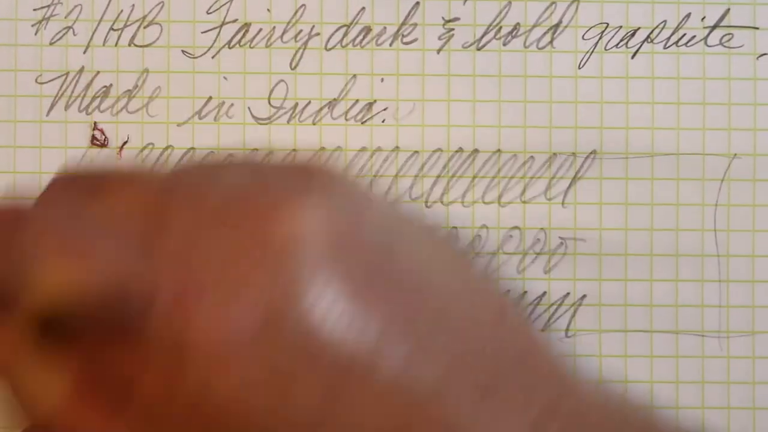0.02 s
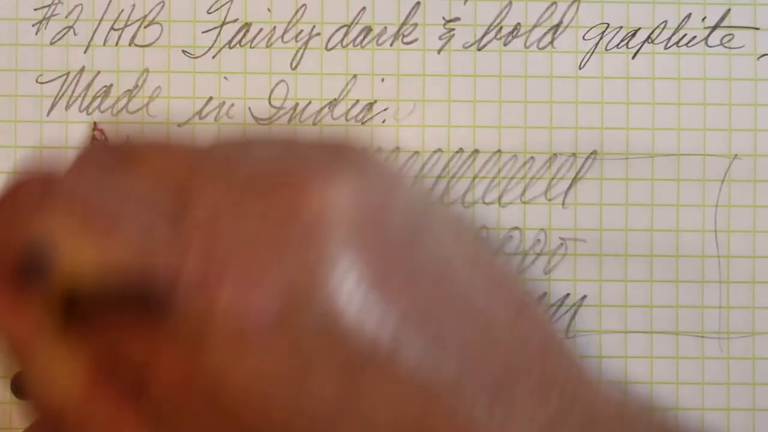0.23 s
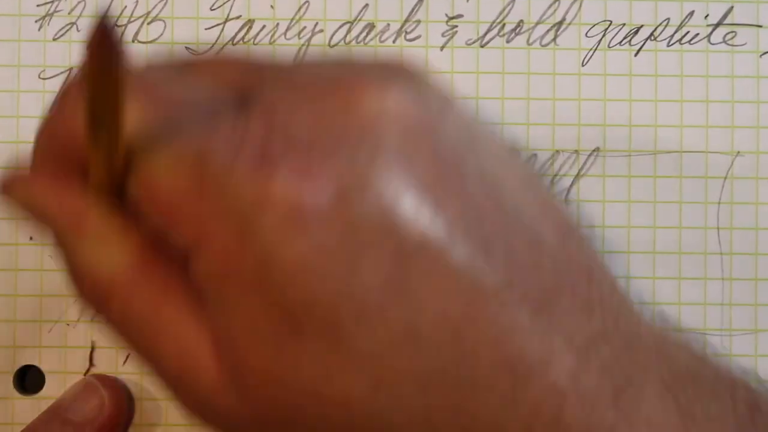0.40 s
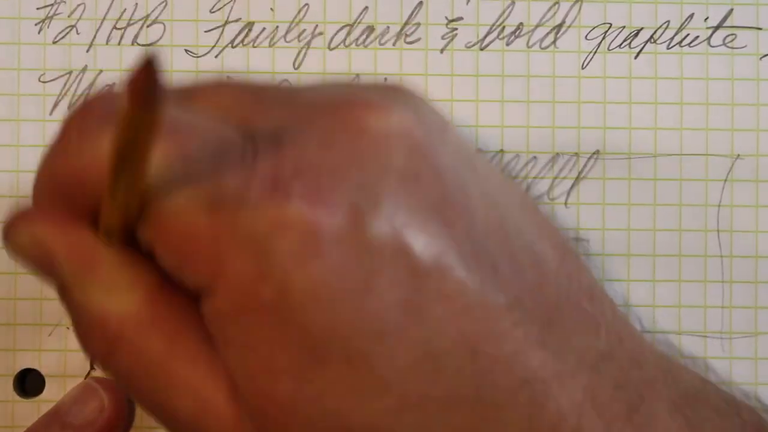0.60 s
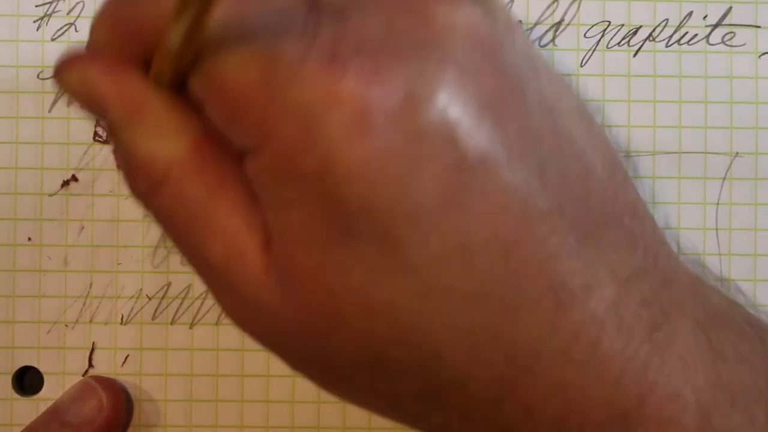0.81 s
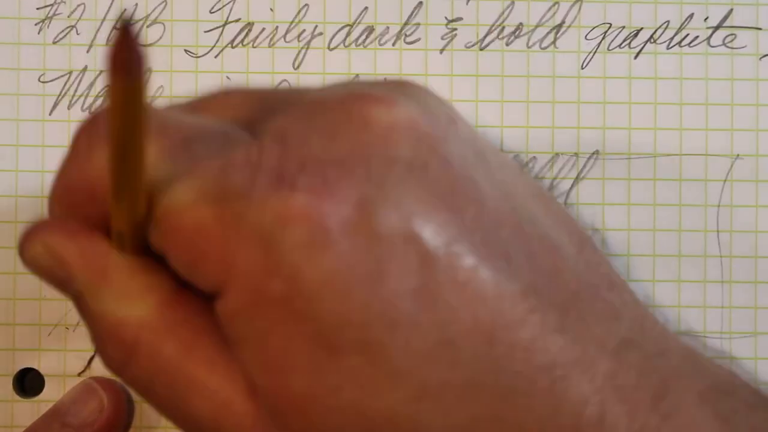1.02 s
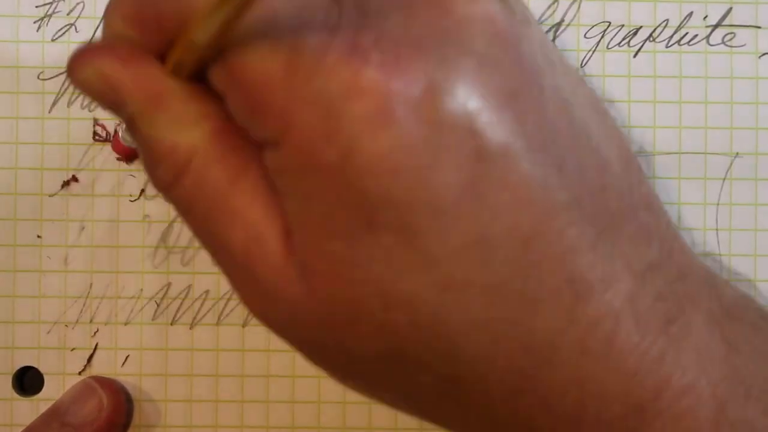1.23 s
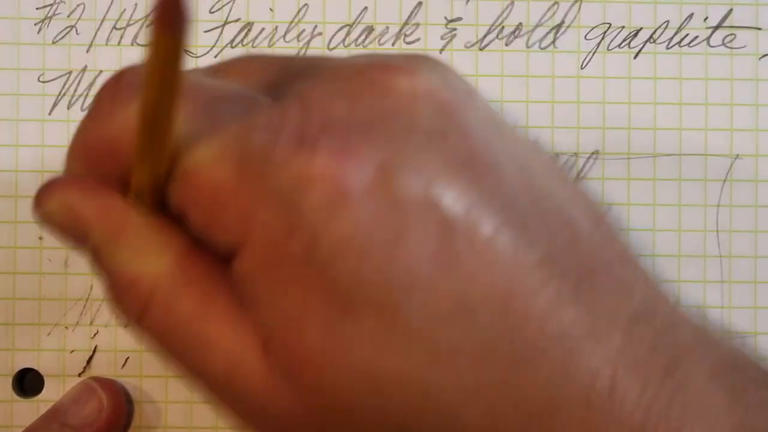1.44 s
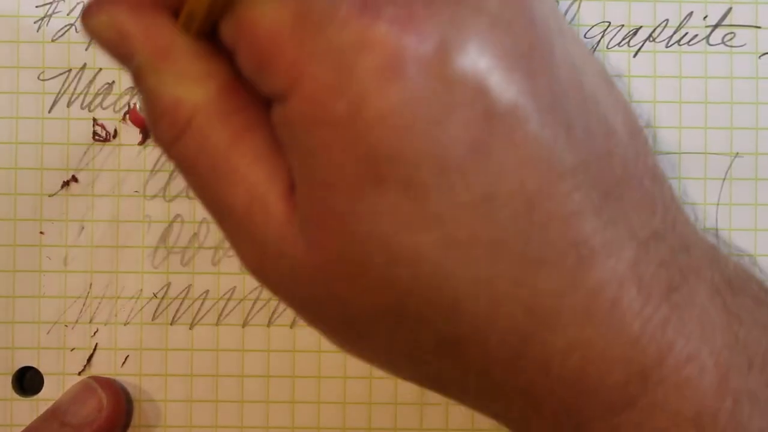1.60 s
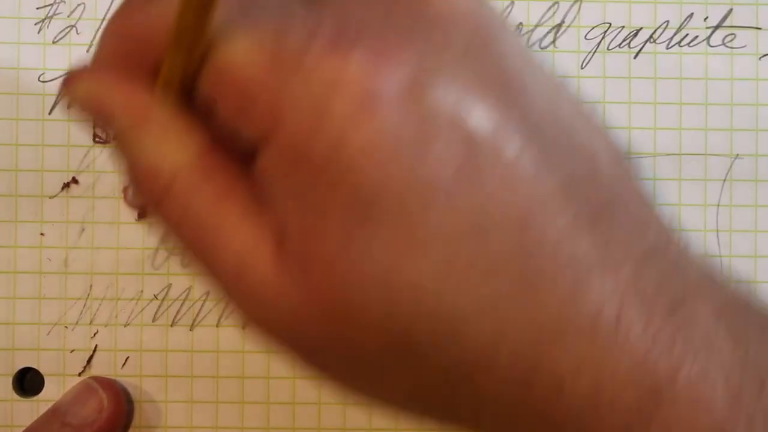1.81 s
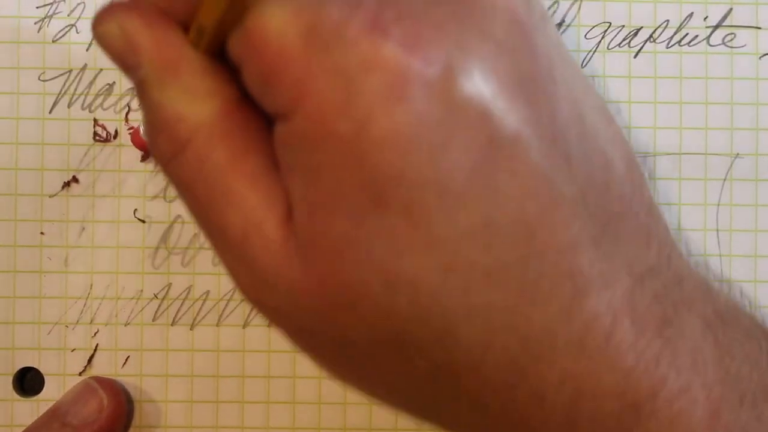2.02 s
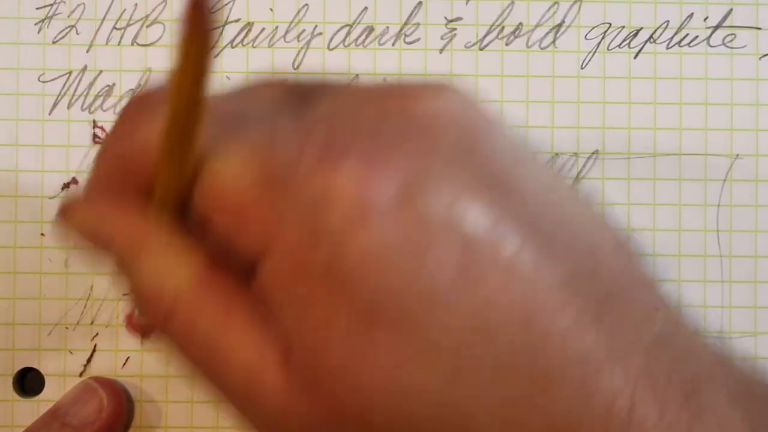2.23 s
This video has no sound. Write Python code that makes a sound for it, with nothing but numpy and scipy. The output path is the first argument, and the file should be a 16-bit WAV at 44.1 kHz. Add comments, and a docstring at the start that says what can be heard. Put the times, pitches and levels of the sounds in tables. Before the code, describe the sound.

A pencil-top eraser rubs paper in short, dry, gritty strokes, several per second. A strong hand knock thuds on the desk near the start, a lesser one follows, then faint bumps. Quiet small room, close stereo microphone.

```python
"""A pencil-top eraser scrubs a paper pad on a desk in a quiet room, one short stroke after another.
Each stroke is dense friction grit, ringing brightly in the sheet and dully in the pad; the pad also hums in the desk.
Listed knocks of the hand make the desk thud, ring briefly, crack and shudder, built from fading sines and noise.
Filtered feedback delays give the room's echoes, and soft filtered noise is the room floor below."""
import sys
import numpy as np
from scipy import signal
from scipy.io import wavfile

SR = 44100
rng = np.random.default_rng(int(sys.argv[2]) if len(sys.argv) > 2 else 0)


def attenuation_scalar(level_db):
    """Turn a level in dB into a linear amplitude multiplier (20 dB per decade)."""
    decades = np.asarray(level_db, float) / 20
    return 10 ** decades


def transcribe(signal):
    """Save signal, clipped to [-1, 1], as a 16-bit WAV file at the path in sys.argv[1]."""
    frames = np.atleast_2d(signal).T
    limited = np.clip(frames, -1, 1)
    pcm = np.round(limited * 32767).astype(np.int16)
    wavfile.write(sys.argv[1], SR, pcm)


N = 101430   # length in samples

# The desk's ways of ringing: four lists of low modes, then one of high modes.
# Each row: pitch in Hz, relative level in dB, time to fade by 60 dB in seconds.
DESK = [
    [(197.3, 5.5, 0.16), (129, -21, 0.45)],
    [(235, 0.5, 0.18), (261.5, -5, 0.14)],
    [(340.8, 2.5, 0.15), (386.8, -5.5, 0.21)],
    [(534, 4, 0.043), (647, -6.5, 0.15), (762.6, -1.5, 0.053)],
    [(891, -7, 0.16), (1180, 2, 0.043), (1350, -18.5, 0.6), (1565, 6, 0.043), (1777, -11.5, 0.48),
     (1916, 6.5, 0.048), (2188, -8, 0.13), (2410, -2.5, 0.12), (2571, -4.5, 0.25), (3189, -4, 0.16),
     (3610, -14, 0.2), (3630, -5.5, 0.079), (4700, -27, .08), (5570, -14, .07)],
]
# How the sound leans to one side. Each row: frequency in Hz, left minus right in dB.
LEANING = [(60, 0), (240, -2), (950, -0.5), (3770, 0.5), (15000, 1.0)]


def rms_one(x):
    """Scales a signal to an average (rms) strength of 1."""
    return x / np.sqrt(np.mean(x ** 2) + 1e-20)


def at_hz(points, hz):
    """Reads a curve between its listed frequencies, on a logarithmic pitch scale."""
    listed_hz, values = np.transpose(points)
    return np.interp(np.log(hz), np.log(listed_hz), values)


def left_right_gains(lean_db):
    """Raises the left and lowers the right by the same number of dB."""
    return attenuation_scalar(np.array([[lean_db], [-lean_db]]))


def drift(rate_hz):
    """Slow random wandering with a spread of 1: noise smoothed twice, made at every 40th sample."""
    r = np.exp(-2 * np.pi * rate_hz * 40 / SR)
    noise = rng.standard_normal(N // 40 + 2002)
    slow = signal.lfilter([1], [1, -2 * r, r * r], noise)[2000:]   # skips the filter's start
    return np.interp(np.arange(N) / 40, np.arange(len(slow)), rms_one(slow))


def ring(x, hz, t60):
    """A resonance: a unit click sets a sine going, which fades by 60 dB in t60 seconds."""
    r = attenuation_scalar(-60 / (t60 * SR))
    w = 2 * np.pi * hz / SR
    return signal.lfilter([0, np.sin(w)], [1, -2 * r * np.cos(w), r * r], x + 1e-18)


def dying(at, db, seconds):
    """Envelopes that jump up at the given samples and fade exponentially."""
    edge = np.zeros(N)
    edge[at] = attenuation_scalar(db)
    return signal.lfilter([1], [1, -np.exp(-1 / (seconds * SR))], edge + 1e-18)


def band_pass(x, order, low_hz, high_hz):
    """Keeps the sound between two frequencies."""
    return signal.sosfilt(signal.butter(order, [low_hz, high_hz], "band", fs=SR, output="sos"), x)


def bands(source, spectrum, patchy_db, tilt_db=0):
    """Splits a source (2 draws x mid, side) into half-octaves, each with its level, flicker, tilt and place."""
    # How alike the two sides are. Each row: frequency in Hz, likeness (1 = the same, 0 = unrelated).
    likeness = [(60, 0.82), (240, 0.66), (950, 0.63), (3770, 0.7), (15000, 0.53)]
    out, total = 0, 0
    edges = 25 * 2 ** np.arange(0, 9.6, .5)
    for k, (low, high) in enumerate(zip(edges, edges[1:])):
        hz = np.sqrt(low * high)
        if hz < .8 * spectrum[0][0] or hz > 1.2 * spectrum[-1][0]:
            continue
        mid, side = band_pass(source[k % 2], 2, low, high)   # neighbouring bands use different draws
        alike = np.clip(at_hz(likeness, hz), -1, 1)
        level_db = at_hz(spectrum, hz)
        gain = attenuation_scalar(level_db + patchy_db * drift(10.6) + tilt_db * np.log2(hz / 6000))
        stereo = np.sqrt(1 + alike) * mid + np.sqrt(1 - alike) * side * [[1], [-1]]
        out = out + gain * stereo * left_right_gains(at_hz(LEANING, hz) / 2)
        total += attenuation_scalar(2 * level_db) * 4 * (high - low) / SR
    return out / np.sqrt(total)   # evens out the overall level of the spectrum


def room_floor():
    """The soft, steady noise of the quiet room: random noise shaped band by band."""
    # Each row: frequency in Hz, relative level in dB per Hz.
    floor_spectrum = [(15, -38), (25, -6.5), (210, 3), (446, -3), (538, -9), (1180, -7.5), (2570, -14),
                      (3020, -13.5), (5030, -18.5), (10700, -23.5), (15600, -29)]
    floor_db = -54   # level of the whole floor
    return attenuation_scalar(floor_db) * bands(rng.standard_normal((2, 2, N)), floor_spectrum, patchy_db=-0.5)


def room(x):
    """Echoes between walls: six feedback delays a side, weaker and duller on every round."""
    t60_s, wall_cut_hz = 0.4, 6000
    shared = 0.13   # share of each side's echoes that reaches the other side
    out = np.zeros((2, N))
    dull = np.exp(-2 * np.pi * wall_cut_hz / SR)
    lags = (rng.uniform(.012, .035, size=12) * SR).astype(int)
    for k, lag in enumerate(lags):
        loop, state = x.copy(), [0.]
        gain = attenuation_scalar(-60 * lag / SR / t60_s)
        for i in range(lag, N, lag):
            back, state = signal.lfilter([gain * (1 - dull)], [1, -dull], loop[i - lag:i], zi=state)
            loop[i:i + lag] += back[:N - i]
        out[k % 2] += (loop - x) * (-1) ** (k // 2)   # echoes only, with alternating sign
    high_pass = signal.butter(2, 400.0, "high", fs=SR, output="sos")
    return signal.sosfilt(high_pass, out + shared * out[::-1])


def low_desk_tones(at, levels_db):
    """Low desk modes start late after a blow, swell, ring freely, then the hand damps them."""
    lag_cycles, swell_cycles = 0.31, 0.65   # in cycles of the first mode in each list
    free_s, damping_s, damped_db = 0.01736, 0.0068, -6
    out = np.zeros((2, N + SR))   # room for the last tones to run over
    for k, modes in enumerate(DESK[:4]):
        first_hz = modes[0][0]
        t = np.maximum(np.arange(SR // 3) / SR - lag_cycles / first_hz, 0)
        swell = 1 - np.exp(-t * first_hz / swell_cycles)
        damping = attenuation_scalar(damped_db * np.clip((t - free_s) / damping_s, 0, 1))
        tone = 0
        for j, (hz, db, t60) in enumerate(modes):
            tone = tone + attenuation_scalar(db - 60 * t / t60) * np.sin(2 * np.pi * hz * t) * (-1) ** j
        tone = swell * damping * tone * left_right_gains(at_hz(LEANING, first_hz) / 2)
        for i, db in zip(at, levels_db[:, k]):
            out[:, i:i + len(t)] += attenuation_scalar(db) * tone
    return out[:, :N]


def high_desk_ring(at, levels_db):
    """High desk modes swell quickly after each blow and ring on with a flickering level."""
    swell_s, flicker_db = .009, 5.5
    out = np.zeros((2, N))
    for hz, db, t60 in DESK[4]:
        clicks = np.zeros(N)
        sizes = attenuation_scalar(levels_db + db + rng.normal(0, 1, len(at)))
        clicks[at] = sizes * rng.choice([-1, 1], len(at))
        drive = ring(clicks, hz, swell_s) * 2 * np.log(1000) / (swell_s * SR)   # a brief ring feeds the long one
        lean = at_hz(LEANING, hz) / 2 + rng.normal(0, 3.1)
        out += ring(drive, hz, t60) * left_right_gains(lean) * attenuation_scalar(flicker_db * drift(30.0))
    return out


def knocks():
    """Each blow sets the low and high desk modes ringing, cracks and leaves a deep shudder of noise."""
    # Knocks and catches on the desk. Each row: time in seconds, then levels in dB, before the changes
    # below, of the lowest mode, thud, hollow, woody, ring and crack.
    knock_list = [(0.004, -42.5, -37.5, -44.5, -53.5, -49, -65), (0.073, -58, -58, -56.5, -81, -56, -66),
                  (0.141, -51.5, -48, -60, -45.5, -63, -68), (0.235, -19.5, -20, -22.5, -28, -31, -22),
                  (0.422, -45.5, -42, -61, -48.5, -66, -45), (0.435, -44, -40, -39.5, -44, -58, -38),
                  (0.519, -27.5, -35, -29.5, -32, -36.5, -29.5), (0.558, -51, -36.5, -42, -40.5, -56, -53),
                  (0.631, -43, -45, -45, -47.5, -65, -62), (0.711, -61, -34.5, -38.5, -42, -51, -41),
                  (0.747, -70, -37, -46, -39.5, -69, -46), (0.788, -63, -66, -43.5, -48, -53, -43),
                  (0.998, -53, -62, -58, -43, -65, -56), (1.258, -64, -32, -46, -63, -52, -53),
                  (1.288, -51, -58, -52, -45, -56, -53), (1.355, -67, -59, -49, -67, -87, -64),
                  (1.455, -60, -33, -41, -41, -47.5, -43), (1.647, -54, -45, -46.5, -62, -67, -55),
                  (1.776, -48.5, -63, -71, -45.5, -61.5, -52), (1.838, -55, -35.5, -54, -44.5, -56.5, -50),
                  (1.937, -71, -67, -72, -45, -59, -56), (2.081, -71, -75, -59, -75, -81, -55),
                  (2.123, -54.5, -74, -48.5, -61, -66.5, -56), (2.168, -53, -59, -46.5, -33.5, -60, -44),
                  (2.212, -59, -33.5, -49, -44, -59, -45.5), (2.268, -52, -55, -70, -63, -82, -76)]
    crack_boost_db, crack_s, crack_hz = 1, .016, 5100
    shudder_db, shudder_s, shudder_hz = -23, 0.077, 134   # level relative to the strongest of the first three
    rows = np.array(knock_list)
    at = (rows[:, 0] * SR).astype(int)
    out = low_desk_tones(at, rows[:, 1:5]) + high_desk_ring(at, rows[:, 5])
    noise = rng.standard_normal((2, N)) * 0.9 + rng.standard_normal(N)   # partly the same on both sides
    crack = dying(at, rows[:, 6] + crack_boost_db, crack_s) * noise
    shudder = dying(at, rows[:, 1:4].max(axis=1) + shudder_db, shudder_s) * noise.mean(axis=0)
    shudder = shudder * np.sqrt(SR / 2 / shudder_hz)   # makes up for the narrow band kept below
    return out + band_pass(crack, 3, 600, crack_hz) + band_pass(shudder, 2, 45, shudder_hz)


def grit():
    """Dense random slips of the rubber on the fibres: clicks of varied size and either sign."""
    slips_per_s, spread_db = 7000, 2
    shape = (2, 2, N)
    sizes = attenuation_scalar(spread_db * np.minimum(rng.exponential(1, shape), 5)) * rng.choice([-1, 1], shape)
    return rms_one(sizes * (rng.random(shape) < slips_per_s / SR))


def rubbing():
    """The rubber speeds up and slows down in each stroke; the rasp, rumble and brightness follow its speed."""
    # Each row: start in seconds, length in seconds, place of the peak (0-1), sheet rasp in dB,
    # brightness at full speed in dB per octave, pad rumble in dB before it is smoothed.
    stroke_list = [(0.0, 0.067, 0, -43, -3, -53.5), (0.134, 0.067, 0.32, -42, 0.5, -59),
                   (0.254, 0.11, 0.1, -44.5, -2, -50), (.415, 0.1, 0.24, -43.5, -2.5, -49.5),
                   (0.622, 0.085, 0.5, -50.5, -6, -54.5), (0.729, 0.042, 0.43, -53.5, -7, -51.5),
                   (0.767, .12, 0.67, -42.5, -2.5, -55.5), (0.974, 0.14, 0.47, -45.5, -3, -51),
                   (1.176, 0.11, 0.66, -41.5, -0.5, -52.5), (1.41, 0.092, 0.44, -44.5, -1.5, -47),
                   (1.553, 0.11, 0.63, -43, -1, -50.5), (1.769, 0.072, .5, -49.5, -4.5, -52),
                   (1.928, 0.053, 0.43, -46.5, -2.8, -53.5), (2.132, 0.12, 0.6, -46, -2, -46)]
    # Strength of the sheet's resonant bite in dB, one value for each stroke.
    bites_db = [-22, -1.5, -5, -13, -12, -0.5, -15, -7, -12, -4, -6.5, -8, -6, -5.5]
    sheet_shoulder, pad_shoulder = 0.8, 0.27   # roundness of the stroke: smaller is flatter on top
    dull_when_slow_db = -3.5   # dB per octave added at the slow ends of a stroke
    t = np.arange(N) / SR
    sheet, pad, tilt, bite = np.zeros((4, N))
    for (start, length, top, sheet_db, bright_db, pad_db), bite_db in zip(stroke_list, bites_db):
        phase = np.interp((t - start) / length, [0, np.clip(top, .02, .98), 1], [0, .5, 1])
        speed = np.abs(np.sin(np.pi * phase)) * (phase > 0) * (phase < 1)
        sheet = sheet + attenuation_scalar(sheet_db) * speed ** sheet_shoulder
        pad = pad + attenuation_scalar(pad_db) * speed ** pad_shoulder
        tilt = np.where(t >= start, bright_db + dull_when_slow_db * (1 - speed), tilt)
        bite = np.where(t >= start, attenuation_scalar(bite_db), bite)
    return sheet, pad, tilt, bite


def sheet_rasp(tilt, bite):
    """Grit heard through the bright paper sheet, which also rings at its own resonances."""
    # Each row: frequency in Hz, relative level in dB per Hz.
    rasp_spectrum = [(880, -8), (1500, -8.5), (2600, -6), (3100, -16), (3590, -7.5), (4910, -4),
                     (8080, -0.5), (10000, -3.5), (13700, -20), (15600, -26)]
    # Resonances. Each row: pitch in Hz, about half the resonance's width in Hz, relative level in dB.
    sheet_peaks = [(5470, 550, 7.5), (5170, 160, -8.5), (6780, 440, 0), (8640, 3400, -5), (3830, 400, -7.5)]
    rasp = bands(grit(), rasp_spectrum, patchy_db=2.0, tilt_db=tilt)
    peaks = sum(attenuation_scalar(db) * rms_one(ring(rasp, hz, 1.15 / width)) for hz, width, db in sheet_peaks)
    return rasp + bite * rms_one(peaks)


def desk_hum(push):
    """The pad's noisy push keeps the low desk modes ringing."""
    hum = 0
    for modes in DESK[:4]:
        for hz, db, t60 in modes:
            hum = hum + attenuation_scalar(db) * ring(push, hz, t60) / np.sqrt(t60 * SR / 14)   # evens long and short rings
    return hum


def strokes():
    """The eraser's strokes: bright rasp in the sheet, dull rumble in the pad and a hum in the desk."""
    # Each row: frequency in Hz, relative level in dB per Hz.
    pad_spectrum = [(35, -37), (60, 1.5), (324, -11.5), (568, 9.5), (1110, -11.5), (1380, -4.5), (1590, -9),
                    (1720, -26), (2500, -18), (3250, -16), (5500, -120)]
    pad_lingers_s, pad_in_desk_db = 0.013, -8.5
    sheet, pad, tilt, bite = rubbing()
    rasp = sheet_rasp(tilt, bite)
    keep = np.exp(-1 / (pad_lingers_s * SR))
    pad = signal.lfilter([1 - keep], [1, -keep], pad)   # the pad dies away later
    pad = pad * attenuation_scalar(1.21 * drift(27.0))
    hum = attenuation_scalar(pad_in_desk_db) * desk_hum(pad * rng.standard_normal(N))
    rumble = pad * bands(grit(), pad_spectrum, patchy_db=3.0)
    return sheet * attenuation_scalar(1.14 * drift(40.0)) * rasp + rumble + hum


def scene():
    """Strokes and knocks, their echoes in the room, and the room floor."""
    room_db = -16
    desk = strokes() + knocks()
    return desk + attenuation_scalar(room_db) * room(desk.mean(axis=0)) + room_floor()


def top_cut(x):
    """Nothing passes above the cut-off."""
    return signal.sosfilt(signal.butter(12, 15730, fs=SR, output="sos"), x)


def record(dry):
    """Turns the finished mix into the sound that is written."""
    return top_cut(dry)


dry = scene()
out = record(dry)
transcribe(out)
```